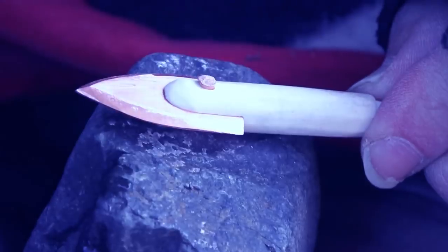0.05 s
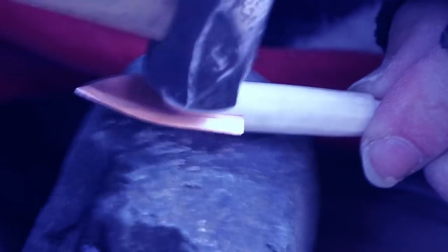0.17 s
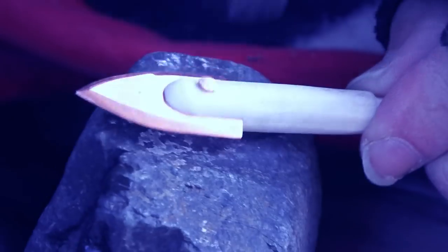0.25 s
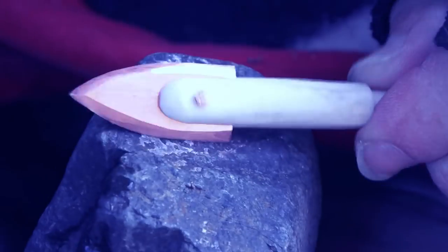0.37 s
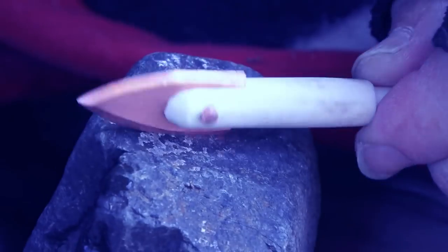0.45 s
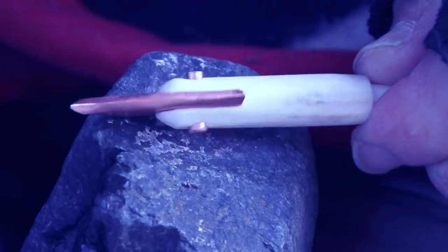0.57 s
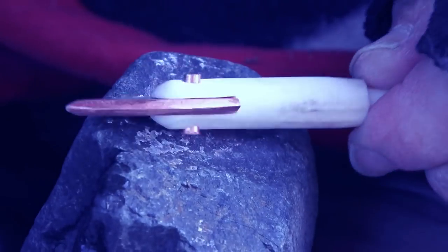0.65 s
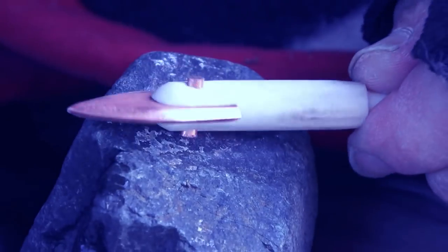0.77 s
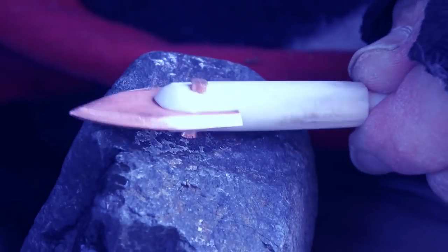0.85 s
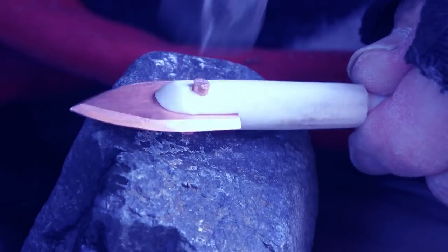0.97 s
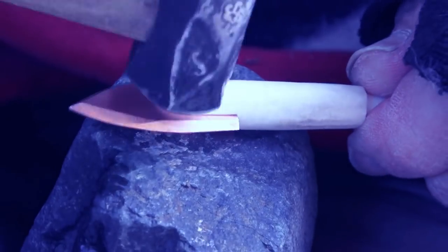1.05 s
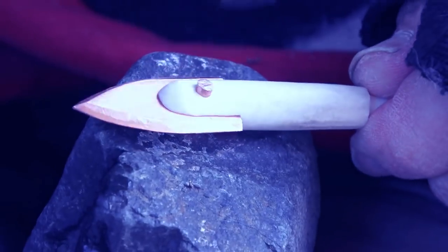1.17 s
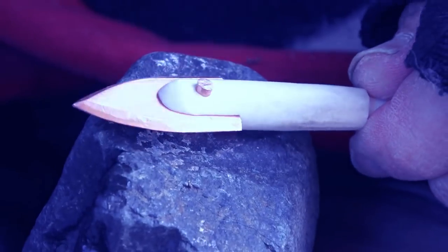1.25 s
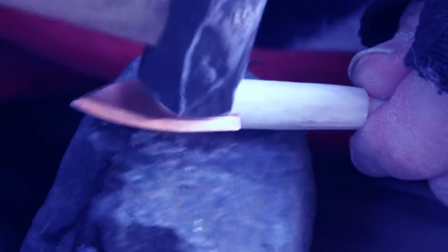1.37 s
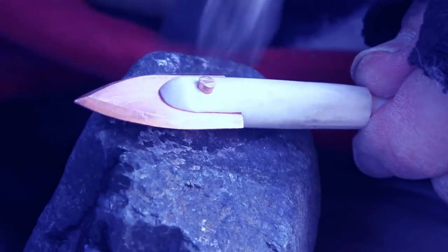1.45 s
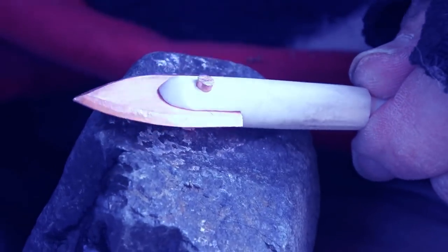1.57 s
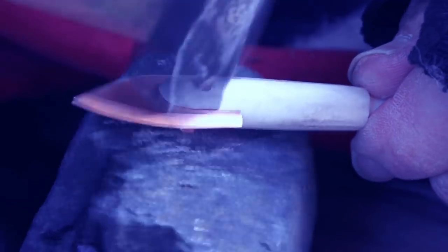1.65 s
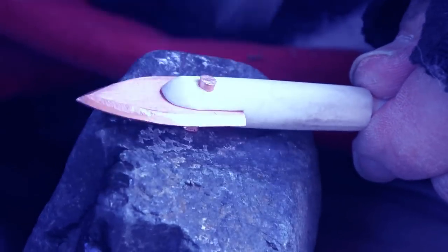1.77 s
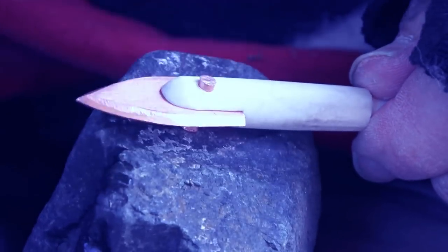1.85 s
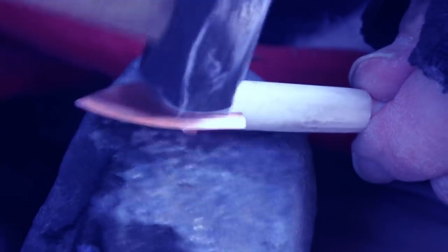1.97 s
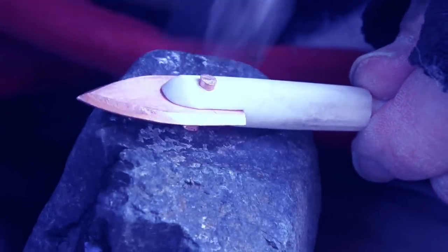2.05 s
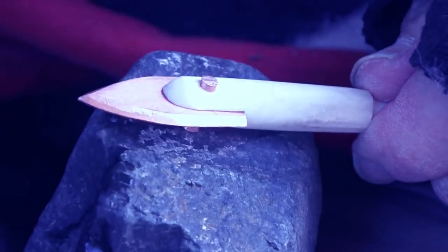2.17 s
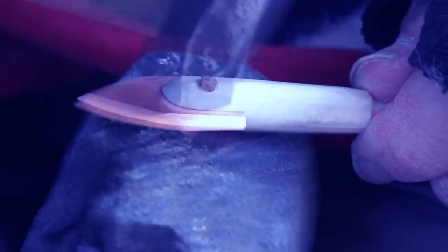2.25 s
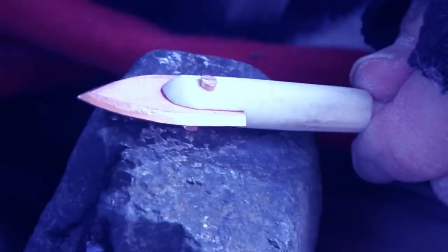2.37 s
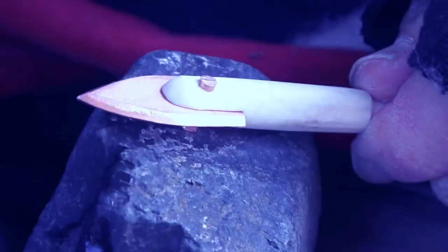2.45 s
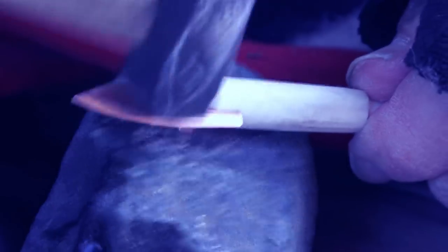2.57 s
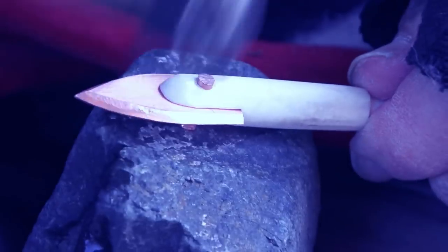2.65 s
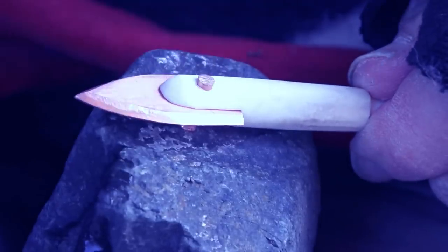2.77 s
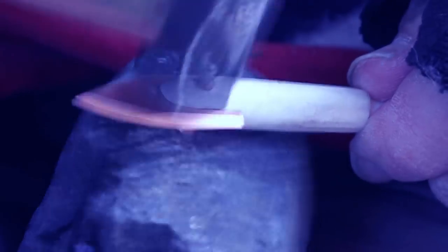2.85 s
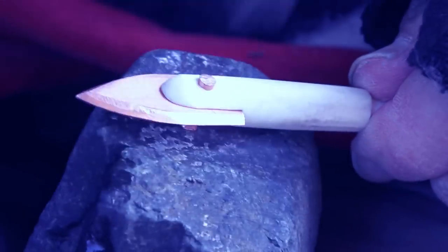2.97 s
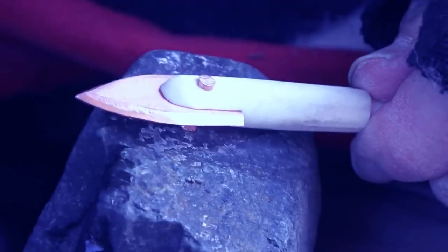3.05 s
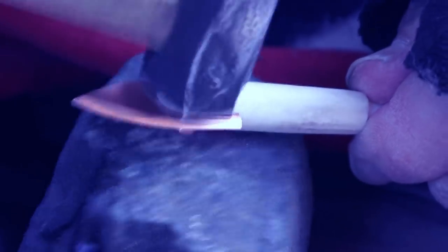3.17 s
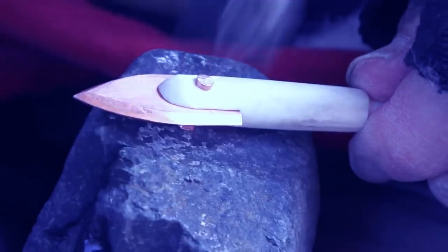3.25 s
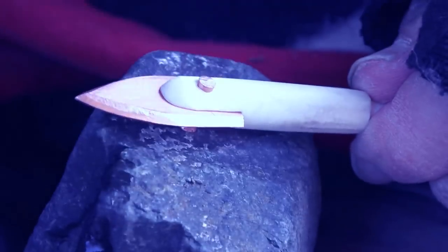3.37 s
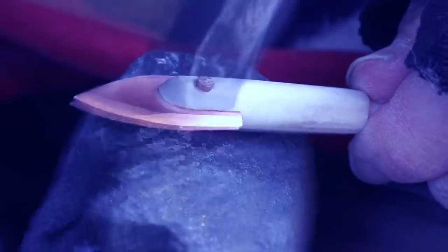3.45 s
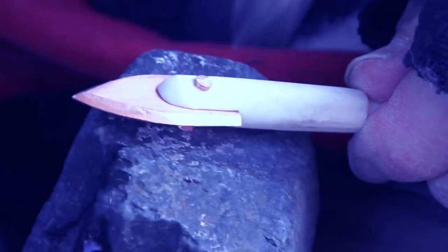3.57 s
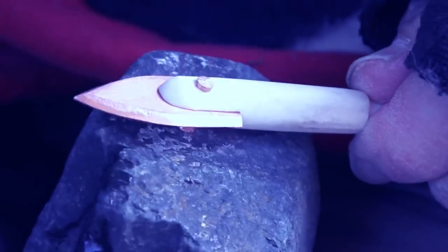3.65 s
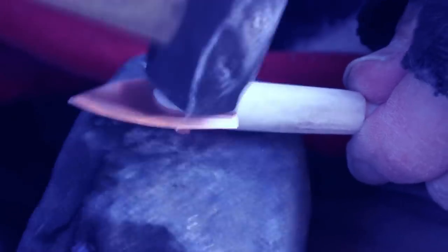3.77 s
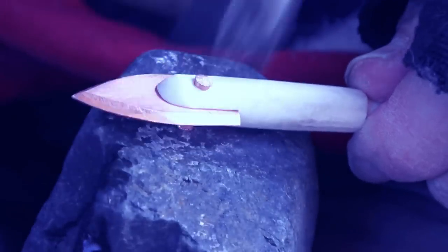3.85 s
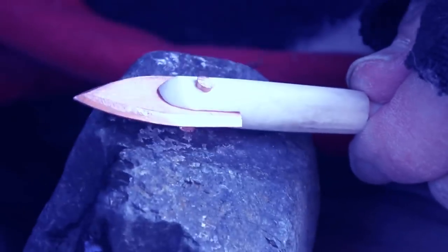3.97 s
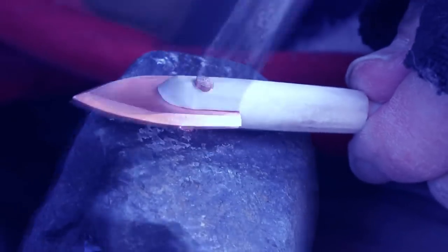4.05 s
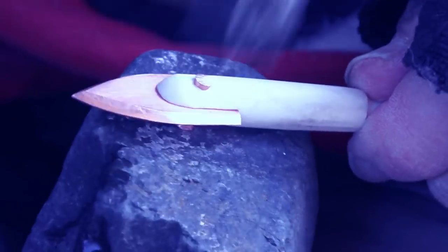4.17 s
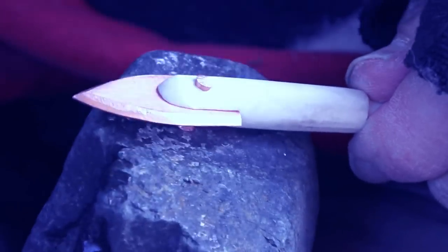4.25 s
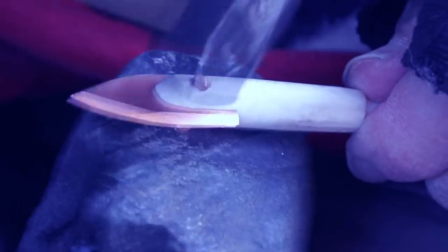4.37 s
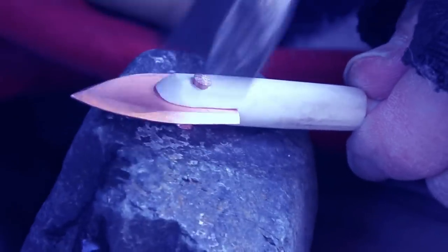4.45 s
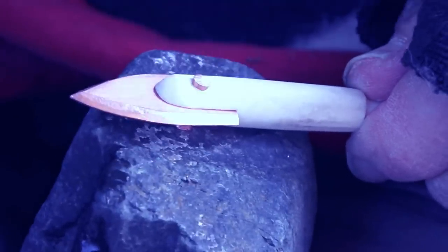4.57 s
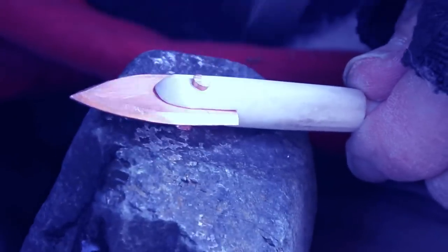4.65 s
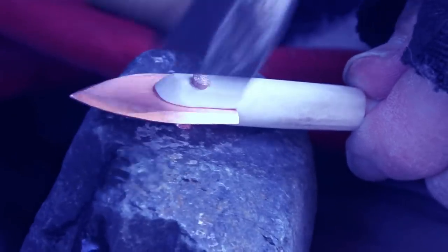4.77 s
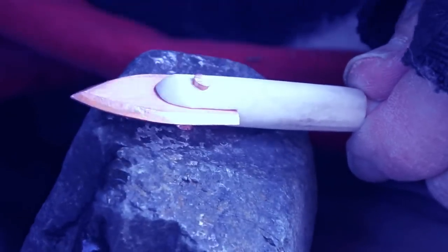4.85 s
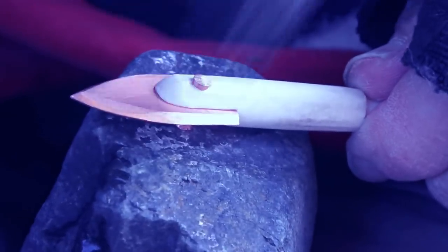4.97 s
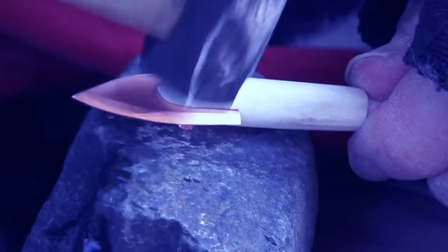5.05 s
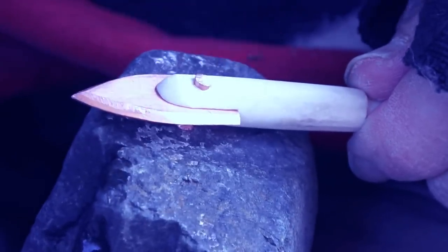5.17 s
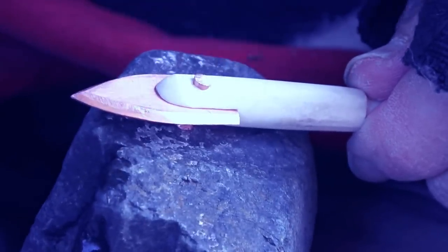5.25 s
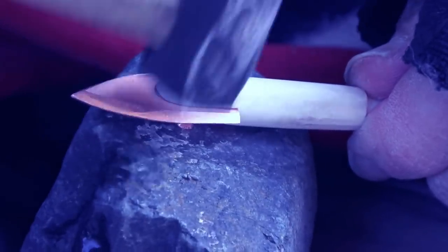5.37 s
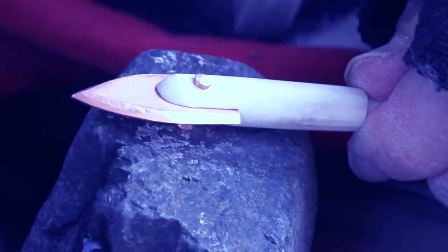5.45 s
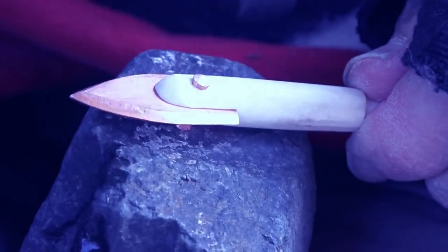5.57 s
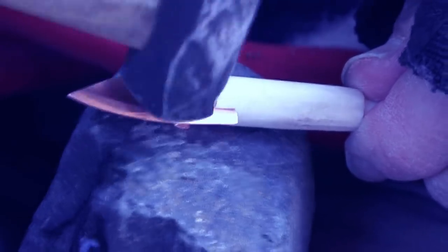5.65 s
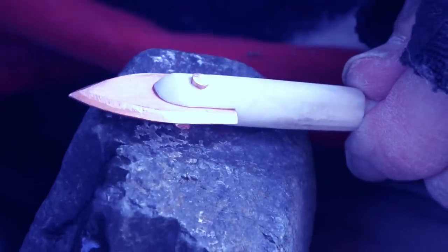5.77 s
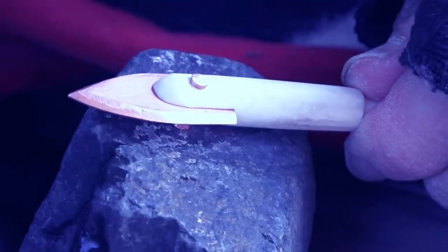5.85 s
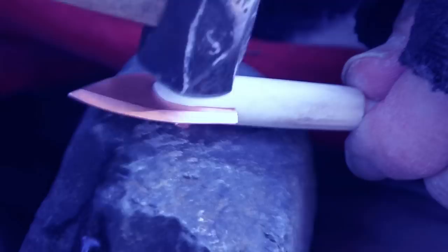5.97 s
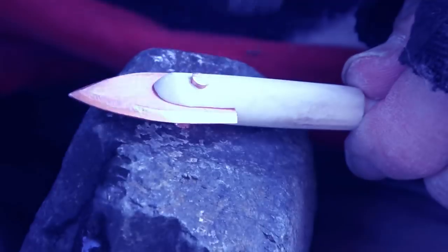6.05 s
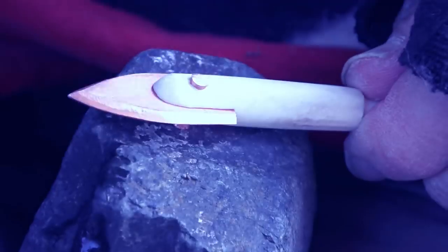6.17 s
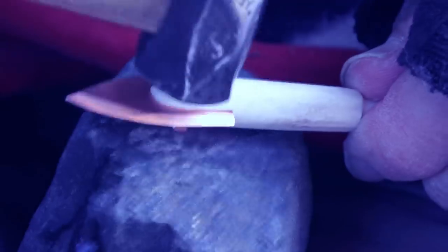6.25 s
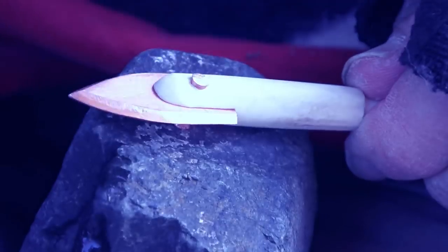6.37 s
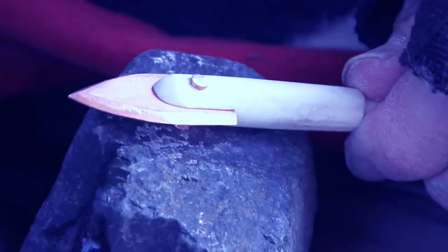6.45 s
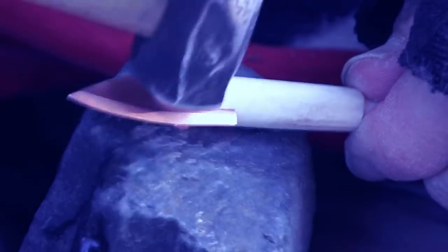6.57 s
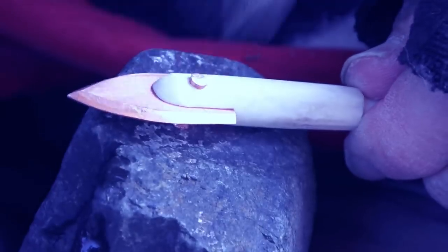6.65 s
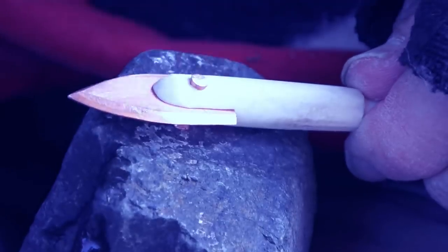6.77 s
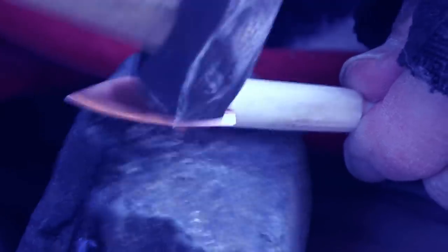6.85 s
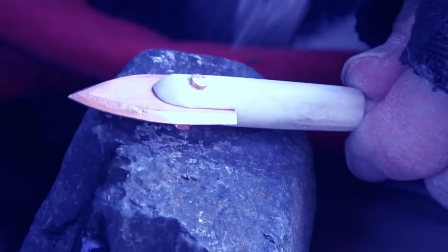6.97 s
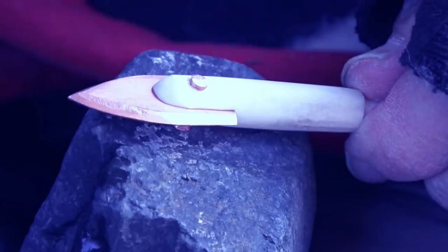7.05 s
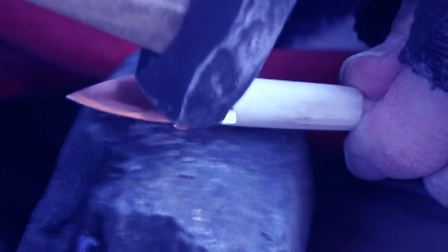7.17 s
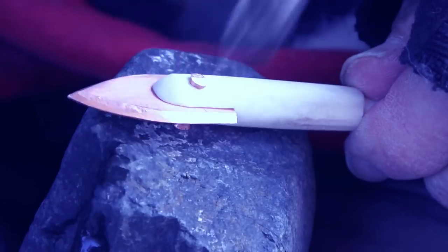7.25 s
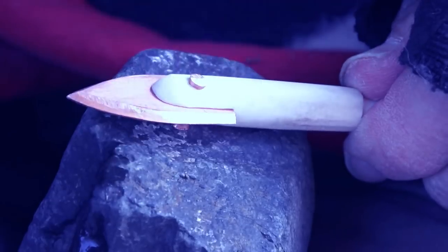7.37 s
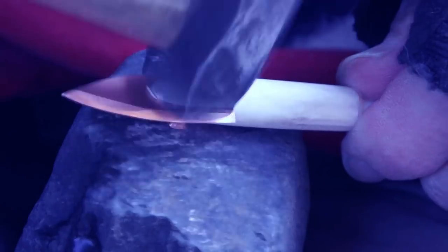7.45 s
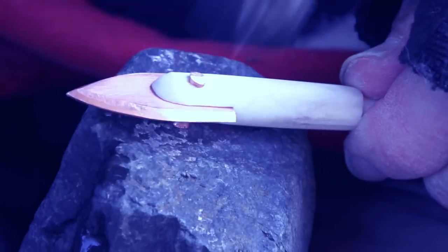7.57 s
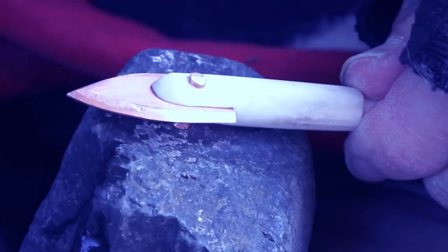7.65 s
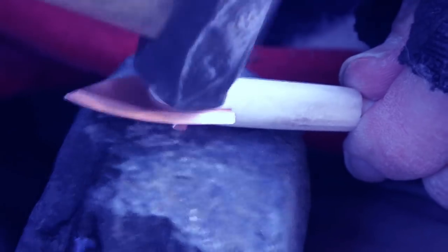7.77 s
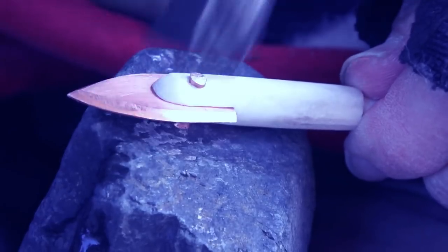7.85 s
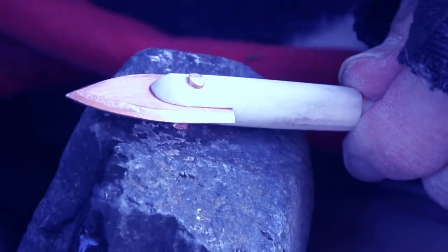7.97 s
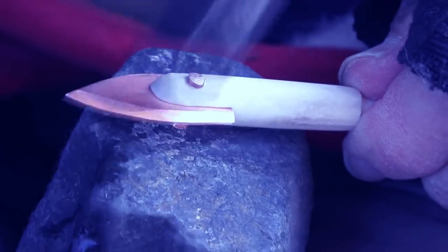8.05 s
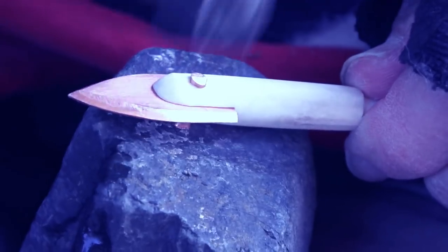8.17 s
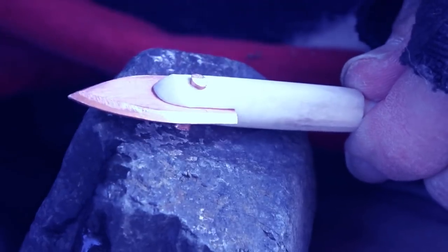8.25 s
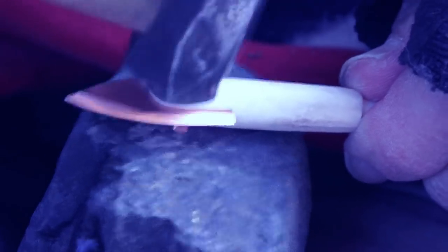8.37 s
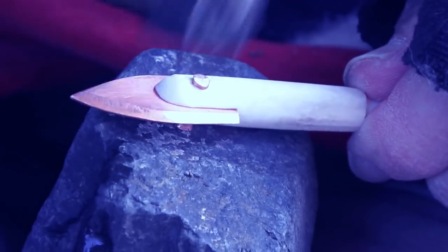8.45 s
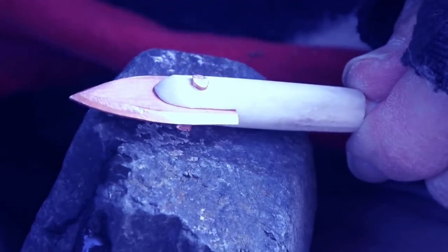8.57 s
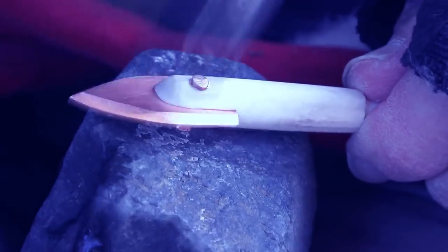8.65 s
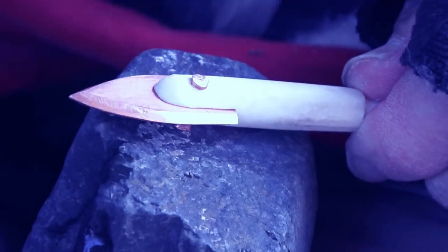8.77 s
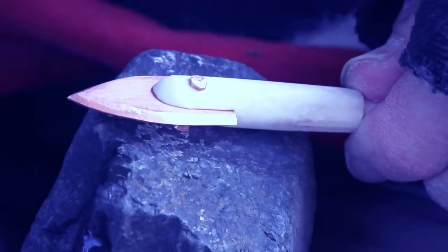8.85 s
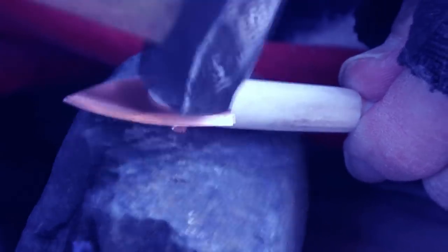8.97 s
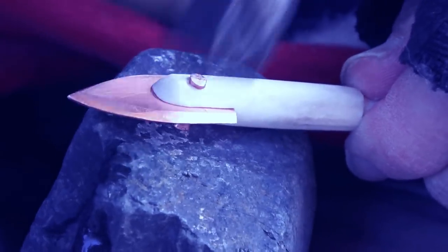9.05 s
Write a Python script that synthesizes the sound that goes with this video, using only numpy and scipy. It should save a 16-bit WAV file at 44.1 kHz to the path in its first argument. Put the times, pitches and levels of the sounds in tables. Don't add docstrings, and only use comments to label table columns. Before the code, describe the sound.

Hard, dry metallic hammer taps on a rivet over stone, overloaded and echoing off near walls, with brief high bird notes and faint traffic.

```python
import sys
import numpy as np
from scipy import signal
from scipy.fft import rfft, irfft
from scipy.io import wavfile
from scipy.ndimage import uniform_filter1d

SR = 44100
rng = np.random.default_rng(int(sys.argv[2]) if len(sys.argv) > 2 else 0)


def put_to_file(sound):
    columns = np.atleast_2d(sound).T
    safe = np.clip(columns, -1, 1)
    whole_steps = np.round(safe * 32767)
    wavfile.write(sys.argv[1], SR, whole_steps.astype(np.int16))


def amplitude_ratio(level_db):
    exponent = np.asarray(level_db, float) / 20
    return 10 ** exponent


N = 401310

# [t/s, peak level/dB, crack level/dB re peak, hammer head level/dB re peak]
BLOWS = [(-0.083, -0.5, -18, -23), (0.177, 3, -18, -37.5), (1.395, 0, -23.5, -45),
         (1.694, -0.5, -21.5, -34.5), (2, 2, -17, -38), (2.298, 3, -17.5, -43), (2.592, 3, -17, -47),
         (2.891, 2, -17.5, -31), (3.193, 2, -17.5, -24), (3.5, 1, -14.5, -23), (3.799, 0.5, -15, -24),
         (4.105, -0.5, -16.5, -27), (4.418, -0.5, -19, -30), (4.734, 0, -14, -26.5),
         (5.037, 0.5, -16.5, -29.5), (5.354, -1.5, -19, -36), (5.66, -0.5, -17, -30.5),
         (5.975, 0, -16.5, -52), (6.282, 0, -21, -33), (6.581, 1, -14.5, -33), (6.868, 1, -16.5, -35),
         (7.171, -2, -21, -32), (7.804, 0, -17.5, -37), (8.105, 1.5, -16.5, -38), (8.406, 1.5, -17.5, -35),
         (8.707, 0.5, -13.5, -26.5), (9.007, 0.5, -14, -33)]
# [t/s, peak level/dB, hardness/dB, blade level/dB, crack level/dB]
MUFFLED = [
    (1.074, -5.5, 2, -23.5, -28.5),
    (7.4873, -1.5, -1, -34, -23.5),
]
# [t/s, peak level/dB, blade level/dB, crack level/dB]
BOUNCES = [(1.721, -16.5, -40, -26), (2.0309, -8.5, -28, -27), (2.917, -6, -19, -28),
           (3.2195, -5.5, -17, -39), (3.5345, -5.5, -15.5, -28), (3.8326, -7.5, -17.5, -45),
           (4.13, -9.5, -15.5, -34), (4.454, -11, -38, -26), (5.075, -10, -27, -30.5),
           (5.387, -13, -33, -31), (5.689, -9.5, -32, -29), (6.6188, -11.5, -17, -27),
           (6.9034, -7.5, -24, -23.5), (7.194, -8, -30, -28), (7.835, -9, -38, -30),
           (8.44, -11, -33, -26.5), (9.0307, -11, -22, -33)]
# [t/s, peak level/dB, blade level/dB, crack level/dB]
GRIT_TICKS = [
    (8.369, -68, -20, 12),
]
# [f/Hz, level/dB, t60/s]
KNOCK = [(413, -15, 0.0195), (588, 2.5, 0.0091), (988, -5, 0.0085), (1478, -2, 0.006),
         (1962, -14.5, 0.0086)]
# [f/Hz, level/dB, t60/s]
BLADE = [(3100, 1, 0.0115), (2850, -4, 0.007), (3340, -6, 0.008)]
# [f/Hz, level/dB, t60/s]
CRACK = [(4070, -23, 0.00087), (4570, 14, 0.0027), (5160, 11.5, 0.0034), (5700, -0.5, 0.0089),
         (7670, -9, 0.00067), (8600, -0.5, 0.0048), (14200, -28, 0.0043), (14500, -34, 0.003)]
# [level/dB, t60/s]
HEAD_DECAYS = [
    (0, .02),
    (1, .115),
]
# [low f/Hz, high f/Hz]
CLICK_BANDS = [(1740, 3900), (3900, 5000), (5000, 6300), (6300, 7600), (7600, 9000), (9000, 14000)]
# [delay t/s, level/dB]
ECHOES = [(.0075, -21.5), (.0115, -14.5), (.015, -18), (.0218, -15), (.0242, -21), (.029, -60), (.042, -17)]
# [delay t/s, level/dB]
BLADE_ECHOES = [(.0111, -5), (.0125, -8), (.0145, -55), (.0165, -12), (.0205, -31), (.024, -19.5),
                (.028, -9)]
# [f/Hz, level/dB, t60/s]
YARD = [(290, -16, 0.081), (660, -38, 0.13), (1140, -22.5, 0.38), (2200, -25, 0.13), (3090, -14, 0.42),
        (4300, -2, 0.13), (6500, -14.5, 0.3), (9400, -19, 0.094), (13700, -19, 0.091)]
# [share of the length, pitch f/Hz, level/dB]
HIGH_VOICE = [(0, 8000, -8), (.16, 6500, -1.5), (.36, 5720, -2), (.62, 5750, -3.5), (1, 6060, 0.5)]
LOW_VOICE = [(.05, 5700, -5), (.33, 4350, -8), (.6, 4620, -3.5), (.86, 5150, 4), (1, 5200, -17)]
WHISTLE = [(0, 6900, -8), (.35, 7030, -3.5), (.6, 7036, -3), (.92, 6990, -5), (1, 6720, -14)]
UPSLUR = [(0, 4600, -1), (.17, 3680, -2.5), (.55, 4430, 0), (.92, 4830, -2), (1, 5006, -16)]
# [t/s, length t/s, level/dB, pitch ratio, share of the full pitch swing]
DUETS = [(1.492, 0.089, -31.5, 1.02, 1.04), (4.444, .1, -40, 1.03, 0.84), (6.89, 0.095, -33.5, .99, .9)]
WHISTLES = [(1.688, .092, -24, 0.99, 1.3), (4.647, 0.11, -35, 1.005, 0.91),
            (7.139, 0.091, -27.5, .993, 1.01)]
UPSLURS = [(1.853, .137, -29.5, 1.01, 1.07), (4.822, 0.14, -33.5, 0.98, 1.06),
           (7.321, .124, -30, 1.01, 1.01)]
# [f/Hz, level/dB per Hz]
AIR = [(12, -53), (20, 15.5), (37, -2), (134, -5.5), (310, -11.5), (472, -10.5), (527, -16.5), (590, -15.5),
       (976, -20), (2600, -28), (3070, -27.5), (4060, -32), (16000, -37.5)]
# [t/s, half-width t/s, rise level/dB]
RUMBLE_PASSES = [(1.3, 0.63, 4.5), (2.2, 0.84, 7.5), (5.8, 0.17, 2.5), (9.2, 0.55, 5)]
DRONE_PASSES = [(1.7, 0.13, 4.3), (3.15, 0.33, 9.3), (4.3, 0.31, 12), (5.0, 0.17, 4.1), (5.9, .2, 9.7),
                (6.6, 0.32, 11), (7.2, 0.087, 6.6), (8.9, 0.48, 4.4)]
# [t/s, length t/s, f/Hz, level/dB]
HUM = [
    (4.92, .11, 558, -53),
    (5.852, .08, 554, -56),
    (5.967, 0.49, 552, -54),
]

USUAL_CRACK_DB, HARD_DB, HARD_PER_CRACK, BLADE_DB, BLADE_PER_CRACK = -12, 3.5, 0.12, -12.5, 0.3
MUFFLED_HEAD_DB, BOUNCE_HARD_DB, BOUNCE_HEAD_DB = -37, 0.7, -40
PUSH_S, SOFTER_PER_DB, SLAP_DB = 0.0003, 0.2159, 4
TRAVEL_S = 0.0008
BLADE_BOOST_DB, CRACK_BOOST_DB, HEAD_BOOST_DB, HEAD_HZ = 9, 6.5, 4.5, 11632
GRIT_DB, GRIT_T60_S, CLICK_DB, CLICK_SCATTER_DB = 4.5, 0.021, 30.5, 2.5
TO_WALLS_KNOCK_DB, TO_WALLS_BLADE_DB = -7.5, -1
THUD_HZ, THUD_DB, THUD_RISE_S, THUD_T60_S = 45.9, -34, 0.029, 0.52
ECHO_BAND_HZ, YARD_START_S, YARD_RISE_S = (830, 1300), 0.003, 0.022
BIRD_WET_DB, BIRD_T60_S, BIRD_RISE_S = -2, 0.46, 0.0017
SCOOP_S, SCOOP_DEPTH, OVERTONE_DB, FLUTTER_DB, FLUTTER_HZ = 0.003, 0.5, -42, 2.5, 90
DEEP_HZ, RUMBLE_HZ, DRONE_HZ = (25.1, 86.5), (90.4, 214.4), (341, 418)
AIR_DB, DEEP_DB, RUMBLE_DB, DRONE_DB = -40.5, -47, -46, -56.5
WANDER_DB, WANDER_HZ = 3, 3.3
OVERLOAD, TOP_HZ, SIDE_DB, SIDE_LOW_DB = 0.93, 15750, -25, -36


def contacts():
    square = []
    for s, peak_db, crack_db, head_db in BLOWS:
        sharper = crack_db - USUAL_CRACK_DB
        hard_db = HARD_DB + HARD_PER_CRACK * sharper
        blade_db = BLADE_DB + BLADE_PER_CRACK * sharper
        square.append((s, peak_db, hard_db, blade_db, crack_db, head_db))
    dull = [row + (MUFFLED_HEAD_DB,) for row in MUFFLED]
    light = [(s, peak_db, BOUNCE_HARD_DB, blade_db, crack_db, BOUNCE_HEAD_DB)
             for s, peak_db, blade_db, crack_db in BOUNCES + GRIT_TICKS]
    return sorted(square + dull), light


def hammer(rows):
    out, t = np.zeros((3, N + 2 * SR)), np.arange(SR // 4) / SR
    chance = rng.standard_normal((len(rows), 2, 8))
    upper = np.arange(8) >= 3
    for (s, peak_db, hard_db, blade_db, crack_db, head_db), (a, b) in zip(rows, chance):
        push = PUSH_S * (1 + SOFTER_PER_DB * max(HARD_DB - hard_db, 0))
        after = np.maximum(t - push, 0)
        detune = 1 + 0.015 * a
        slap = amplitude_ratio(SLAP_DB) * np.sin(np.pi * np.minimum(t / push, 1))
        knock = slap - ring(KNOCK, after, detune, b + hard_db * upper)
        blade = amplitude_ratio(blade_db + BLADE_BOOST_DB) * ring(BLADE, after, detune[3:] ** 0.5, b[3:])
        crack = amplitude_ratio(crack_db + CRACK_BOOST_DB) * ring(CRACK, after, detune[::-1], 1.5 * b[::-1])
        head_decay = sum(amplitude_ratio(db) * fade(t, t60) for db, t60 in HEAD_DECAYS)
        head = amplitude_ratio(head_db + HEAD_BOOST_DB) * np.sin(2 * np.pi * HEAD_HZ * after) * head_decay
        crushed = amplitude_ratio(crack_db + GRIT_DB) * band(noise(len(t)), 2800, 10700) * fade(t, GRIT_T60_S)

        spike = 1.0 * (t == 0)
        click = sum(amplitude_ratio(CLICK_SCATTER_DB * c) * band(spike, *hz) for hz, c in zip(CLICK_BANDS, a))
        click = amplitude_ratio(crack_db + CLICK_DB) * click
        far_knock = amplitude_ratio(TO_WALLS_KNOCK_DB + hard_db) * knock
        far_blade = amplitude_ratio(TO_WALLS_BLADE_DB) * blade * fade(t, 0.018)

        i = int((1 + s + TRAVEL_S) * SR)
        out[0, i:i + len(t)] += amplitude_ratio(peak_db) * (knock + blade - crack + head + amplitude_ratio(-8) * crushed)
        out[1, i:i + len(t)] += amplitude_ratio(peak_db) * (far_knock + far_blade + click)
        out[2, i:i + len(t)] += amplitude_ratio(peak_db) * blade
    return out


def ring(modes, t, detune, scatter_db):
    hz, db, t60 = np.transpose(modes)[:, :, None]
    k = len(modes)
    size = amplitude_ratio(db + scatter_db[:k, None]) * fade(t, t60)
    return (size * np.sin(2 * np.pi * hz * detune[:k, None] * t)).sum(axis=0)


def thuds():
    out, t = np.zeros(N + 2 * SR), np.arange(SR // 2) / SR
    shape = np.minimum(t / THUD_RISE_S, 1) ** 2 * fade(t, THUD_T60_S)
    for s, peak_db, *_ in BLOWS + MUFFLED:
        a, b = noise(2)
        tone = np.sin(2 * np.pi * THUD_HZ * (1 + 0.12 * b) * t)
        i = int((1 + s) * SR)
        out[i:i + len(t)] += amplitude_ratio(THUD_DB + peak_db + 1.5 * a) * shape * tone
    return out[SR:SR + N]


def yard():
    t = np.arange(int(0.6 * SR)) / SR
    rise = np.clip((t - YARD_START_S) / YARD_RISE_S, 0, 1)
    out = band(taps(ECHOES, len(t)), *ECHO_BAND_HZ)
    for hz, db, t60 in YARD:
        scattered = level(band(noise(len(t)), hz / 1.45, hz * 1.45), db - 33)
        out += scattered * fade(t, t60) * rise
    return out


def blade_beam():
    return band(taps(BLADE_ECHOES, SR // 10), 2820, 3010, order=1)


def taps(echoes, length):
    out = np.zeros(length)
    for s, db in echoes:
        out[int(s * SR)] += amplitude_ratio(db)
    return out


def bird():
    scooped = whistle(sung(HIGH_VOICE, DUETS) + sung(UPSLUR, UPSLURS), SCOOP_DEPTH, lead_s=0.0046)
    plain = whistle(sung(LOW_VOICE, DUETS) + sung(WHISTLE, WHISTLES), 0, 0)
    song = scooped + plain
    t = np.arange(SR) / SR
    tail = noise(SR) * fade(t, BIRD_T60_S) * np.minimum(t / BIRD_RISE_S, 1)
    tail /= np.sqrt(np.sum(tail ** 2))
    return song + amplitude_ratio(BIRD_WET_DB) * signal.fftconvolve(song, tail)[:N]


def sung(shape, rows):
    share, hz, db = np.transpose(shape)
    notes = []
    for s, length, level_db, ratio, swing in rows:
        pitch = ratio * (hz[-1] + swing * (hz - hz[-1]))
        notes.append(np.transpose([s + share * length, pitch, db + level_db]))
    return notes


def whistle(notes, scoop, lead_s):
    out = np.zeros(N)
    for s, hz, db in (np.transpose(note) for note in notes):
        t = np.arange(int((s[0] - lead_s) * SR), int(s[-1] * SR)) / SR
        pitch = uniform_filter1d(np.interp(t, s, hz), size=400, mode="nearest")
        pitch *= 1 - scoop * np.exp(-(t - t[0]) / SCOOP_S)
        phase = 2 * np.pi * np.cumsum(pitch) / SR
        flutter_db = FLUTTER_DB * np.interp((t - t[0]) * FLUTTER_HZ, np.arange(64), noise(64))
        size = np.sqrt(2) * amplitude_ratio(np.interp(t, s, db) + flutter_db) * signal.windows.tukey(len(t), 0.12)
        tone = np.sin(phase) + amplitude_ratio(OVERTONE_DB) * np.sin(2 * phase)
        out[int(t[0] * SR):][:len(t)] += size * tone
    return out


def background():
    hz, db = np.transpose(AIR)
    f = np.fft.rfftfreq(N, 1 / SR)
    colour = amplitude_ratio(np.interp(np.log(f + 1), np.log(hz), db))
    air = level(irfft(rfft(noise(N)) * colour, N), AIR_DB)
    rumble = level(band(noise(N), *RUMBLE_HZ), 0) * swell(RUMBLE_PASSES, RUMBLE_DB)
    drone = level(band(noise(N), *DRONE_HZ), 0) * swell(DRONE_PASSES, DRONE_DB)
    deep = level(band(noise(N), *DEEP_HZ), 0) * swell([], DEEP_DB)
    hum = whistle([[(s, hz, db), (s + length, hz, db)] for s, length, hz, db in HUM], 0, 0)
    return air + deep + rumble + drone + hum


def swell(passes, db):
    t, k = np.arange(N) / SR, int(SR / WANDER_HZ)
    wander = uniform_filter1d(np.repeat(noise(N // k + 1), k), k)[:N]
    rise_db = sum(up_db * np.exp(-((t - s) / width) ** 2) for s, width, up_db in passes)
    return amplitude_ratio(db + WANDER_DB * wander + rise_db)


def noise(length):
    return rng.standard_normal(length)


def level(x, db):
    return x * amplitude_ratio(db) / np.sqrt(np.mean(x ** 2))


def band(x, lo_hz, hi_hz, order=2):
    sos = signal.butter(order, [lo_hz, min(hi_hz, 0.45 * SR)], "band", fs=SR, output="sos")
    return signal.sosfilt(sos, x)


def fade(t, t60):
    return np.exp(-np.log(1000) * t / t60)


def scene():
    blows, bounces = contacts()
    near, far, blade = hammer(blows) + hammer(bounces)
    walls = signal.fftconvolve(far, yard())[SR:SR + N]
    beam = signal.fftconvolve(blade, blade_beam())[SR:SR + N]
    mono = near[SR:SR + N] + walls + beam + bird() + background() + thuds()
    return np.array([mono, mono])


def top_cut(x):
    return signal.sosfilt(signal.butter(12, 16680, fs=SR, output="sos"), x)


def record(dry):
    x = signal.sosfilt(signal.ellip(10, 0.2, 70, TOP_HZ, fs=SR, output="sos"), dry)
    x = np.clip(x, -OVERLOAD, OVERLOAD)
    x = signal.sosfilt(signal.butter(8, TOP_HZ - 200, fs=SR, output="sos"), x)
    share = amplitude_ratio(SIDE_DB) * band(x[0], 10500, 21000) + amplitude_ratio(SIDE_LOW_DB) * x[0]
    side = share * level(uniform_filter1d(noise(N), size=40), 0)
    mix = x + side * np.array([[1], [-1]])
    return top_cut(mix)


dry = scene()
out = record(dry)
put_to_file(out)
```